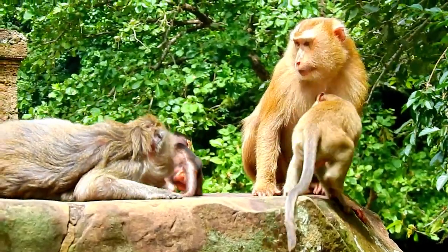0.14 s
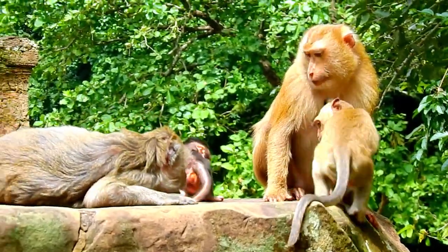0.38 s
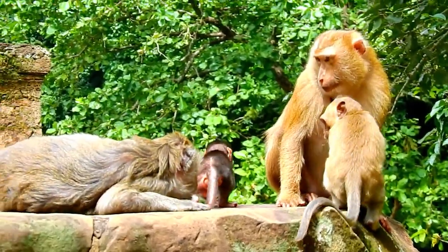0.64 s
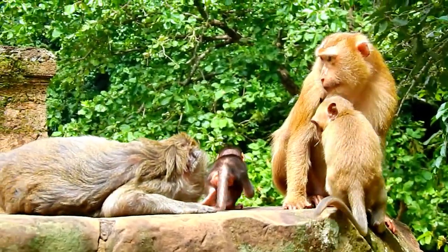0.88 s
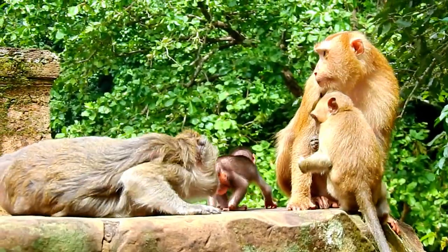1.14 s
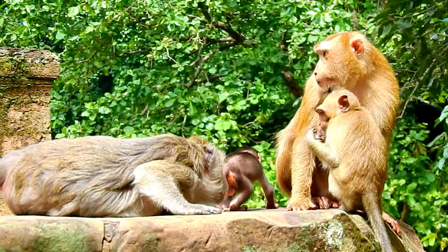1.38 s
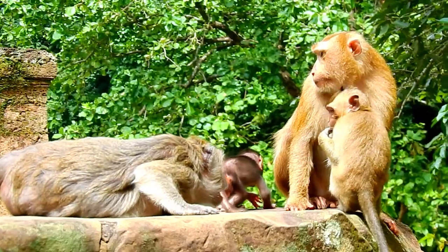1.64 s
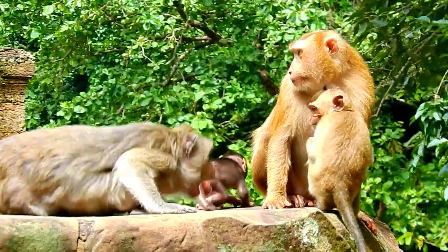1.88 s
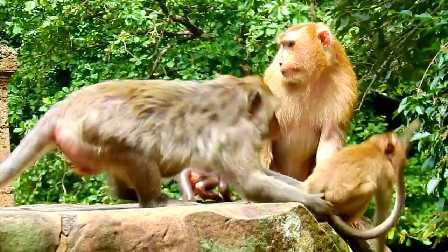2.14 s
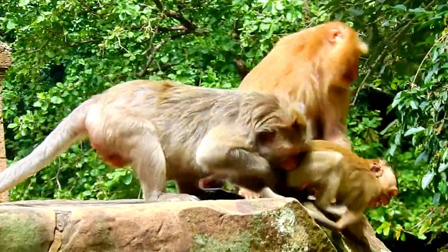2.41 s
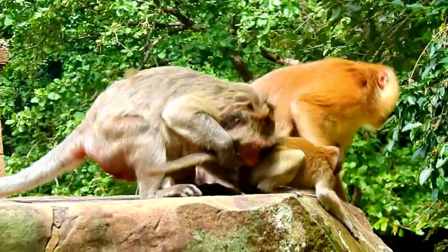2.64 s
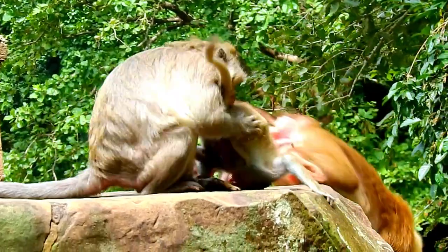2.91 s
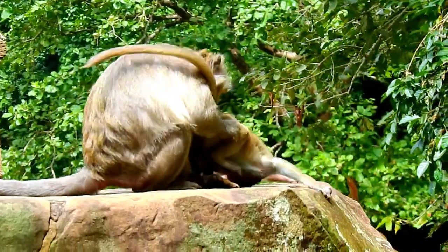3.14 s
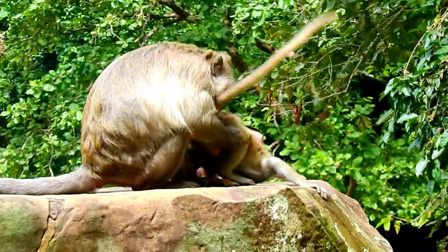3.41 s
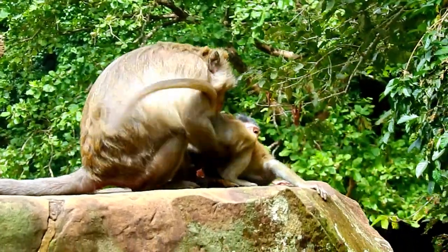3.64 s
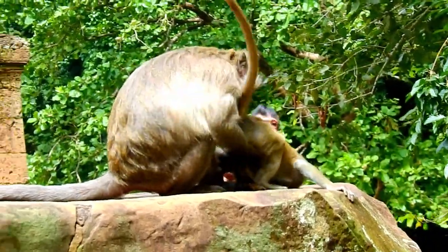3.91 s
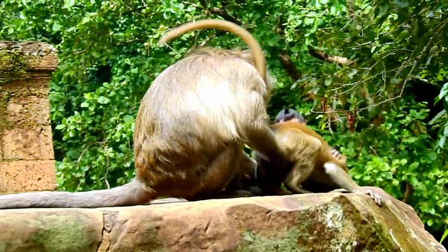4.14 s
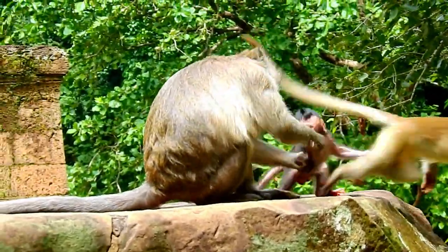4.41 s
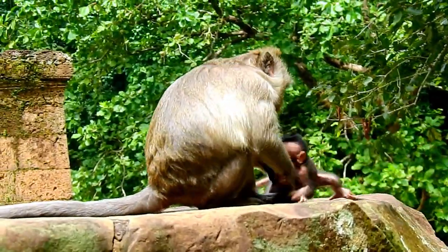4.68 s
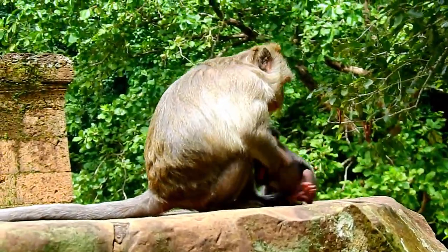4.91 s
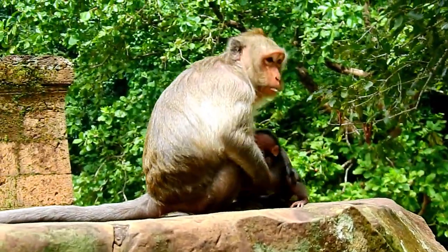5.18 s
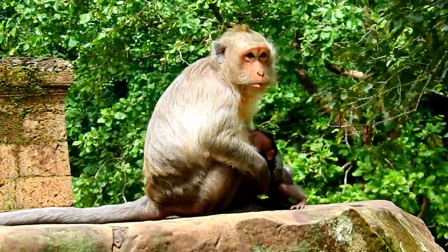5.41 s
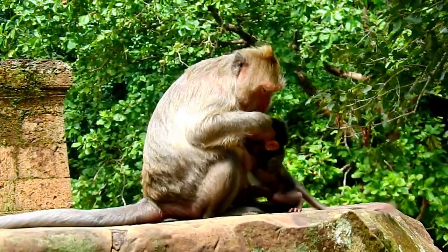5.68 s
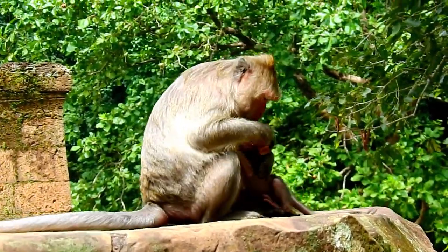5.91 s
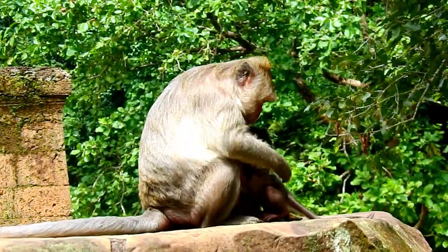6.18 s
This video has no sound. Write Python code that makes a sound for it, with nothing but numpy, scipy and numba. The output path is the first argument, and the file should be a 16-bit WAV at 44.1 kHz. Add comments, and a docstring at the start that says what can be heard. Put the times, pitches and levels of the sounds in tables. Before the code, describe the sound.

A quiet wooded outdoor spot, heard in stereo from a few metres: soft hiss, thin insect buzz, low distant traffic. Light paw taps and scuffs at 0.3 s, with a barely audible far bird whistle at 0.4-0.8 s. At 1.1 s a very loud, dry crack on stone, slightly left, then smaller taps; more slaps at 2.05 s. A short yelp at 2.3 s leads into a young monkey's piercing shriek at 2.4 s, tearing into rasp, weakening around 2.7-3.0 s, then surging harshly at 3.2-3.6 s with two paw slaps. After a tiny gap, another broken scream runs 3.8-4.2 s. Brief yelps at 4.5-4.65 s and a sharp raspy one at 4.8 s. Faint infant squeaks dot 5.1-5.6 s. At 5.95 s a cluster of hard knocks with gritty scuffing, a rough short yelp at 6.1 s, a weak one at 6.2 s. Short scattered echoes throughout.

```python
"""A young monkey shrieks on a stone ledge among trees, an adult grabbing it, a few metres from a camera's microphones.
Its vocal folds whistle at several kHz, made as jittery harmonics, and break into a rasp of noise rung by the throat.
Paws slap and scuff the stone: short noise bursts with ringing modes, and grains of grit. An infant squeaks.
Insects buzz in a narrow noise band, a far bird whistles as a gliding sine and distant traffic hums as low noise.
Coloured noise hisses behind it all; trunks and walls return a short, scattered echo."""
import sys
import numpy as np
from scipy import signal
from scipy.fft import rfft, irfft, next_fast_len
from scipy.io import wavfile
from scipy.ndimage import uniform_filter1d
from numba import njit

SR = 44100
rng = np.random.default_rng(int(sys.argv[2]) if len(sys.argv) > 2 else 0)


def how_loud(loudness_db):
    """Turn decibels into a plain amplitude multiplier (0 dB gives 1, 20 dB gives 10)."""
    steps = np.asarray(loudness_db, float) / 20
    return 10 ** steps


def output_pcm(signal):
    """Save a mono or channel-first signal as 16-bit PCM at the path in sys.argv[1].

    Samples are clipped to [-1, 1] before scaling.
    """
    pcm = np.clip(np.atleast_2d(signal).T, -1, 1) * 32767
    wavfile.write(sys.argv[1], SR, np.round(pcm).astype(np.int16))


N = 277694
TIME = np.arange(N) / SR

# Spectrum of the background hiss. Each row: frequency in Hz, density in dB per Hz (relative).
HISS_COLOUR = [(180, -47.5), (300, -20), (590, -3), (877, -3.5), (1280, 4), (2140, -3.5), (3690, -13),
               (4570, -15), (5660, -20), (6900, -19), (9450, -31.5), (15500, -35)]
# Background hiss over time. Each row: time in seconds, level in dB, added level of its top bands in dB.
HISS_LEVEL = [(0.0, -72.5, 6), (1.4, -70.5, 2), (1.7, -73.5, 1), (2.8, -72.5, 16), (3.4, -73.5, 3),
              (4.3, -75, -15.5), (5.0, -71.5, -11), (5.6, -70.5, -11), (6.3, -71, -5.5)]
# Where the hiss is split into bands that swell apart, in Hz.
HISS_EDGES_HZ = (800, 1700, 3400, 7800)
# Swell of the insect band. Each row: time in seconds, level in dB.
INSECT_LEVEL = [(0.0, -68.5), (.6, -72.5), (1.33, -75), (2.2, -73.5), (4.3, -98.5), (4.804, -68),
                (5.028, -81), (6.297, -77.5)]
# Swell of the distant traffic. Each row: time in seconds, level in dB.
HUM_LEVEL = [(0.0, -68.5), (.75, -75), (1.3, -68.5), (1.61, -74.5), (3.0, -82), (3.3, -76.5), (3.7, -79),
             (4.65, -73), (5.35, -78.5), (6.3, -73.5)]
# Spectrum of the distant traffic. Each row: frequency in Hz, density in dB per Hz (relative).
HUM_COLOUR = [(15, -68), (25, -33), (71, -2.5), (123, -3.5), (161, 1.5), (345, -11.5), (450, -13.5),
              (580, -29), (990, -120)]
# Fur and paws dragging. Each row: start in seconds, length in seconds, level in dB, lows against it in dB.
SCUFFS = [(0.278, 0.36, -67.5, -25), (0.738, 0.37, -76, -8), (1.032, 0.11, -66.5, -1),
          (1.13, 0.013, -63, -8), (1.207, 0.12, -60, -10), (1.698, 0.95, -72.5, -25),
          (2.028, 0.14, -57, -12), (3.267, 0.53, -73, 7.5), (4.042, 0.13, -76, 13), (5.06, 0.5, -79.5, 2.5),
          (5.543, 0.47, -78, 1), (5.709, 0.23, -64.5, -0.5), (5.913, 0.059, -60.5, -18),
          (5.947, 0.064, -45.5, -3), (5.991, 0.19, -57, -5), (6.165, 0.28, -63.5, -22)]
# Spectrum of the grit. Each row: frequency in Hz, density in dB per Hz (relative).
GRIT_COLOUR = [(2060, -44), (3500, -16), (4260, -5.5), (6070, -5), (6660, -0.5), (8120, -17.5),
               (11000, -30.5), (14000, -67.5)]
# Paws on stone. Each row: start in seconds, level in dB, crack pitch in Hz, relative thud in dB,
# left minus right in dB.
SLAPS = [(0.289, -55.5, 7040, -9, -18), (0.34, -53, 6100, -6.5, -10), (1.043, -56, 7140, -39, -27),
         (1.068, -49, 7300, -44.5, -21), (1.135, -18.5, 5440, -45, -9), (1.255, -48.5, 6700, -5.5, 8),
         (1.381, -51, 1940, -6, -5), (1.814, -54.5, 7000, -15, -23), (2.04, -47.5, 6300, -7, 6),
         (2.071, -34.5, 6660, -17, -3), (2.122, -36.5, 6600, -15, 4), (3.525, -36.5, 4400, -28.5, -2),
         (3.625, -39.5, 3452, -21.5, 3), (5.558, -61.5, 4390, 10.5, -9), (5.623, -62.5, 4484, 13, -12),
         (5.726, -49.5, 6840, -1.5, -19.5), (5.908, -49.5, 6350, -21, -15.5), (5.959, -25, 6500, -49, -5),
         (5.98, -29, 6600, -13.5, -5), (5.999, -37.5, 6110, -19, -10), (6.048, -44, 6510, -9, -11)]
# Modes of the ledge. Each row: frequency in Hz, level in dB, own 60 dB decay in seconds (before the blow's).
LEDGE_MODES = [(2798, 2, 0.028), (4710, 10.5, 0.00543), (5475, 6, 0.017), (6600, -3, 0.037),
               (7770, -10.5, 0.025), (12200, -24, 0.014)]
# Far bird. Each row: start in seconds, length in seconds, from Hz, to Hz, level in dB, breath share (not used).
BIRD_NOTES = [(.41, .06, 5000, 5900, -77, 0), (.48, .1, 6280, 6220, -79, 0), (.68, .09, 5000, 6700, -76, 0)]
# Added tones in and between the cries: harmonics, chirps, faint squeaks and separate whistles.
# Each row: start in seconds, length in seconds, from Hz, to Hz, level in dB, breathy share 0-1.
ADDED_TONES = [(2.25, 0.1, 5170, 6060, -61, 0), (2.535, 0.048, 11800, 12170, -58.5, 0.07),
               (2.82, 0.072, 9500, 13100, -64, 0.8), (2.88, 0.041, 12650, 15550, -56.5, 0.2),
               (2.92, 0.031, 7800, 8200, -67, 0.3), (3.01, 0.084, 15600, 14400, -50.5, 0.5),
               (3.088, .028, 13370, 13340, -49, 0.9), (3.115, 0.12, 14400, 14830, -51, 0),
               (3.26, 0.091, 12200, 12200, -62, 0.2), (3.41, .06, 9320, 9000, -49, 0),
               (3.46, 0.059, 5700, 5400, -47.5, 0.34), (3.771, .027, 1996, 3970, -48, 0.38),
               (3.772, 0.034, 1946, 2700, -55, 0.64), (2.576, 0.013, 7900, 7900, -45, 0.14),
               (2.62, .016, 7160, 7050, -44.5, 0.4), (2.975, 0.15, 10500, 10400, -59, 1),
               (3.02, 0.035, 7340, 7450, -60, .6), (3.885, 0.048, 3440, 4650, -63, 0.6),
               (3.92, 0.038, 5200, 6600, -64, .6), (3.968, .022, 11330, 11000, -67, .4),
               (4.456, 0.0099, 7040, 7000, -56, 0.3), (4.505, 0.013, 6780, 5880, -62, 0.58),
               (4.547, 0.074, 3820, 4280, -63, .9), (4.625, 0.081, 3970, 4270, -60, 0.93),
               (4.71, 0.043, 4350, 4560, -74, 1), (5.065, 0.078, 4540, 4340, -81, 0.95),
               (5.21, 0.1, 4250, 4280, -73.5, 0.84), (5.505, 0.13, 4174, 4300, -75, 0.97),
               (5.163, 0.025, 4300, 4230, -64.5, 1), (3.96, 0.033, 4740, 4500, -55.5, .3),
               (3.96, 0.08, 6680, 6770, -52, 0.3), (3.99, 0.13, 3700, 2720, -57, 0.8),
               (4.03, .11, 9040, 8800, -53, .8), (4.07, .06, 5494, 5380, -51.5, 0.3),
               (3.27, .09, 8080, 8240, -47.5, .1), (3.415, .07, 3760, 4060, -52.5, 0.1),
               (5.336, 0.028, 12880, 12800, -67.5, 1), (5.64, 0.058, 4310, 5620, -75.5, 0.8),
               (5.664, 0.019, 10770, 10980, -74.5, 0.42), (6.222, 0.027, 10700, 11370, -68, 0.68),
               (6.255, .04, 10660, 10020, -74, .7), (6.21, .085, 14250, 14400, -80, 0.95)]
# Pitch of the folds in the screams, one list per register they jump to. Each row: time in seconds, pitch in Hz.
FOLD_PITCH = [
    [(2.415, 2183), (2.44, 2696), (2.465, 3108)],
    [(2.47, 2854), (2.52, 2850), (2.54, 2720)],
    [(2.59, 3626), (2.68, 4066), (2.78, 4430), (2.92, 4150)],
    [(2.925, 3042), (2.955, 3305), (2.98, 3160), (3.1, 3366)],
    [(3.25, 2750), (3.28, 2739), (3.35, 2769)],
    [(3.36, 3713), (3.375, 3610), (3.425, 3735), (3.44, 4093), (3.47, 3907), (3.55, 3967), (3.57, 3618),
     (3.615, 3767)],
    [(3.812, 3493), (3.832, 3646), (3.838, 3050), (3.849, 2980), (3.854, 3540), (3.884, 3600), (3.95, 4600),
     (4.03, 4430)],
    [(4.035, 3370), (4.16, 3310)],
]
# The two long screams. Each row: time in seconds, effort in dB, voiced share 0-1, mouth centre in Hz,
# pharynx centre in Hz, gape 0-1.
SCREAMS = [
    [(2.395, -61, 0.01, 6600, 4900, 0.9), (2.403, -43, 0.12, 7300, 5060, 0.73),
     (2.412, -37.5, 0.9, 7840, 4600, 0.85), (2.421, -31.5, 0.65, 8560, 2600, 0.72),
     (2.446, -29, 0.26, 7520, 2720, 0.69), (2.475, -32, 0.4, 8430, 3100, 0.48),
     (2.482, -30.5, 0.14, 6740, 3370, 0.63), (2.524, -36.5, 0.7, 8070, 3130, 0.5),
     (2.54, -38, 0.67, 7650, 3330, 0.54), (2.572, -48.5, 0.13, 7600, 3570, 0.6),
     (2.58, -46, 0.2, 7800, 3560, 0.3), (2.59, -45, 0.05, 7600, 3630, 0.6),
     (2.618, -52.5, 0.06, 7600, 3740, 0.86), (2.629, -45.5, 0.2, 7140, 3430, 0.45),
     (2.641, -48.5, 0.12, 7120, 3850, 0.71), (2.757, -52, 0.45, 7700, 4180, 0.67),
     (2.803, -45.5, 0.34, 8130, 4300, .6), (2.82, -53, 0.56, 7900, 4200, 1),
     (2.9, -59.5, 0.34, 7700, 4300, 1), (2.93, -56.5, 0.46, 7900, 4200, 1),
     (2.955, -51, 0, 8400, 4100, 0.95), (2.962, -70, 0.4, 7500, 4000, 0.65),
     (2.985, -57.5, 0.76, 7060, 3900, 0.4), (3.05, -45, 0.82, 7000, 4270, .4),
     (3.07, -47, 0.67, 6920, 5440, 0.87), (3.09, -43.5, 0.36, 6500, 5360, 0.53),
     (3.21, -44.5, 0.06, 6020, 5280, 0.71), (3.235, -37.5, 0.06, 7800, 4200, 0.57),
     (3.28, -35.5, 0.09, 6230, 4070, 0.67), (3.33, -39, 0.48, 6660, 4100, .7),
     (3.365, -36, 0.39, 7520, 4150, 0.6), (3.409, -46, 0.07, 7220, 4050, 0.89),
     (3.419, -37.5, 0.47, 7600, 3950, 0.63), (3.441, -41, 0.36, 7600, 4300, 0.39),
     (3.475, -36, 0.56, 7770, 3746, 0.5), (3.555, -38, 0.3, 7520, 3370, 0.5),
     (3.569, -37.5, 0.12, 7120, 3740, 0.62), (3.611, -31, 0, 6710, 3520, 0.69),
     (3.621, -40, 0.3, 6300, 3100, 0), (3.635, -44, 0.14, 6360, 3060, 0.17)],
    [(3.775, -59, 0.16, 6850, 2700, 0.3), (3.788, -50.5, 0.45, 7000, 2770, 0.63),
     (3.8, -63, 0.42, 6000, 2900, 0.53), (3.818, -48, 0.54, 6800, 2890, 0.72),
     (3.83, -45, 0.54, 6760, 2900, 0.5), (3.845, -51, 0.4, 6010, 2884, 0.33),
     (3.862, -41, 0.89, 6840, 2950, 0.2), (3.882, -39.5, 0.85, 7100, 3060, 0.28),
     (3.9, -58, 0.46, 7500, 3663, .2), (3.95, -51, 0.57, 8600, 3970, 0.33),
     (3.985, -44, 0.87, 8450, 3700, 0.9), (4.028, -41, .38, 6900, 3350, 0.78),
     (4.056, -34, 0.32, 6600, 3050, 0.77), (4.075, -39.5, 0.15, 6210, 3820, 0.9),
     (4.142, -37.5, 0.45, 6450, 4610, 0.5), (4.2, -69, 0.17, 6580, 4110, 0.8)],
]
# Short cries. Each row: start in seconds, held for seconds, effort in dB, pitch in Hz, voiced share 0-1.
YELPS = [(2.261, .036, -44.5, 3750, 0.35), (4.466, .038, -41.5, 3448, 0.94), (4.545, .045, -55, 3494, 0.7),
         (4.62, .05, -58, 3890, 0.17), (4.787, .018, -36.5, 3620, 0), (5.335, .03, -57.5, 3545, 0.43),
         (6.124, 0.023, -34, 2150, 0.51), (6.202, .04, -54, 3430, 0.3)]
# What the mouth does to each harmonic. Each row: frequency in Hz, gain in dB.
VOICE_COLOUR = [(1800, -19), (2300, -13), (2900, 5), (3500, -16.5), (4200, 9), (5500, -2), (7200, 1),
                (9000, -5.5), (11000, -20), (14000, -18.5)]
# The treble mode moves with the jaw. Each row: time in seconds, centre in Hz.
TREBLE_PATH = [(2.4, 9950), (2.8, 10400), (2.9, 12420), (2.93, 9200), (3.06, 9890), (3.2, 10900),
               (3.26, 11760), (3.45, 11400), (3.55, 10700), (3.8, 12620), (3.92, 12300), (3.98, 11100),
               (4.05, 10610), (4.5, 9650), (4.8, 9600), (5.35, 12930), (6.3, 11100)]
# Throat modes. Each row: centre in Hz, width of one filter pass in Hz, level in dB with the mouth wide open.
THROAT = [(5500, 1000, -6), (7000, 2400, -6), (8400, 1200, -8)]
# The infant's squeaks. Each row: start in seconds, held for seconds, level in dB, middle pitch in Hz.
PEEPS = [(5.083, 0.025, -71, 2896), (5.192, .014, -55.5, 4250), (5.298, 0.013, -59, 3760),
         (5.333, .03, -61, 3704), (5.484, 0.01, -46.5, 4200), (5.527, 0.041, -73, 4270),
         (5.563, .012, -64.5, 4300), (5.597, 0.012, -57.5, 3850)]
# Where the cries come from. Each row: time in seconds, left minus right in dB.
CRY_SIDE = [(2.26, -1.5), (4.28, -1.5), (4.5, -1.5), (5.3, -5), (6.3, -7)]

CALL_RISE_S, CALL_RISE_DB, CALL_SAG_DB, CALL_FALL_DB = 0.003, 14.5, 2.5, 19.5
CALL_STOP_S, CALL_STOP_DB, CALL_TAIL_S = 0.004, 11, 0.024  # cut off, then trailing away
LEFT_RIGHT = np.array([[1], [-1]])


def curve(points):
    """A level or frequency joined by straight lines in time."""
    return np.interp(TIME, *np.transpose(points))


def colour(x, points):
    """Filter by (Hz, dB) points joined on a log axis; rms 1."""
    hz, db = np.transpose(points)
    size = next_fast_len(N)
    f = np.arange(size // 2 + 1) * SR / size + 1
    gain = how_loud(np.interp(np.log(f), np.log(hz), db, -120, -120))
    y = irfft(rfft(x, size) * gain, size)[..., :N]
    return y / np.std(y)


@njit
def svf(x, hz, width):
    """State-variable band-pass with a moving centre."""
    y, band, low = np.empty(len(x)), 0., 0.
    for i in range(len(x)):
        g, k = np.tan(np.pi * hz[i] / SR), width / hz[i]
        v = (band + g * (x[i] - low)) / (1 + g * (g + k))
        band, low, y[i] = 2 * v - band, low + 2 * g * v, k * v
    return y


def ring(x, hz, width):
    """A steep resonance: one band-pass applied three times; rms 1."""
    hz = np.clip(hz + np.zeros(len(x)), 50, .45 * SR)
    for _ in range(3):
        x = svf(x, hz, 1. * width)
    return x / np.std(x)


def walk(rate):
    """Random levels held 1 / rate s and slewed twice; spread 1."""
    hold = max(int(SR / rate), 2)
    steps = np.repeat(rng.standard_normal(N // hold + 1), hold)
    w = uniform_filter1d(uniform_filter1d(steps, hold), hold)[:N]
    return w / np.std(w)


def play(tables, fade_s):
    """Columns of all calls per sample, and a gate that opens only during the calls."""
    s, *columns = np.transpose(np.vstack(tables))
    is_on = sum((TIME >= t[0][0]) & (TIME < t[-1][0]) for t in tables) > 0
    gate = uniform_filter1d(1. * is_on, max(int(fade_s * SR), 1))
    return gate, [np.interp(TIME, s, c) for c in columns]


def glides(rows):
    """Rows of start, length, two pitches, level and breath as curves that grow by 1.5 dB from start to end."""
    return [[(s, a, db - 0.75, share), (s + length, b, db + 0.75, share)]
            for s, length, a, b, db, share in rows]


def short_call(s, length, db, *held):
    """A quick rise, a hold, a sudden stop and a faint tail in level; the other columns are held."""
    end = s + max(length, 2 * CALL_RISE_S)
    return [(s, db - CALL_RISE_DB, *held),
            (s + CALL_RISE_S, db, *held),
            (end, db - CALL_SAG_DB, *held),
            (end + CALL_STOP_S, db - CALL_STOP_DB, *held),
            (end + CALL_TAIL_S, db - CALL_FALL_DB, *held)]


def pan(x, db):
    """Place a sound by its left minus right level."""
    return np.array([x * how_loud(db / 2), x * how_loud(-db / 2)])


def tone(hz):
    """Phase of a gliding oscillator."""
    return 2 * np.pi * np.cumsum(hz) / SR


def breathy(phase, share):
    """A tone whose strength partly tumbles at random, which spreads it into a band."""
    share = np.clip(share, 0, 1)
    return (np.sqrt(1 - share) + np.sqrt(share) * walk(950)) * np.sin(phase)


def hiss(mid, side):
    """Background hiss: coloured noise whose bands swell and flicker apart."""
    noise = colour(mid + 0.27 * side * LEFT_RIGHT, HISS_COLOUR)
    s, db, top_db = np.transpose(HISS_LEVEL)
    lows = [0]
    for hz in HISS_EDGES_HZ:
        lows.append(signal.sosfiltfilt(signal.butter(3, hz, fs=SR, output="sos"), noise))
    lows.append(noise)
    out = 0
    for k, (below, upto) in enumerate(zip(lows, lows[1:])):
        swell_db = 1.8 * walk(5) + 1.3 * walk(22)
        if k > 2:  # the top two bands have a level of their own over time
            swell_db = swell_db + np.interp(TIME, s, top_db)
        out = out + (upto - below) * how_loud(swell_db)
    return out * how_loud(np.interp(TIME, s, db))


def insects(mid, side):
    """A throbbing insect band: noise rung around a slowly wandering pitch."""
    pitch_hz = 4750 * (1 + .015 * walk(4))
    buzz = np.array([ring(v, pitch_hz, 1400) for v in mid + 0.59 * side * LEFT_RIGHT])
    return buzz * how_loud(curve(INSECT_LEVEL) + 2 * walk(12) + 2 * walk(4) + 1.5 * walk(45))


def traffic(side):
    """Distant traffic: a low, nearly centred hum of coloured noise."""
    hum = colour(rng.standard_normal(N) + 0.091 * side * LEFT_RIGHT, HUM_COLOUR)
    return hum * how_loud(curve(HUM_LEVEL) + 1.5 * walk(8))


def background():
    """Hiss, insects and traffic; hiss and insects share their noise, and all three share its side part."""
    mid, side = rng.standard_normal((2, N))
    return hiss(mid, side) + insects(mid, side) + traffic(side)


def scuffs():
    """Dense grains of grit under moving paws; low and high grains come and go apart."""
    s, length, db, low_db = np.transpose(SCUFFS)[:, :, None]
    rise_s, fall_db = 0.011, 11.5  # the fall is over the length
    since = np.clip(TIME - s, 0, None)
    drag = np.minimum(since / rise_s, 1) * how_loud(db - fall_db * since / length)
    grit = rng.standard_normal(N) * how_loud(2.5 * walk(300))
    high = how_loud(0.55 * walk(28) + 2.5 * walk(7)) * colour(grit, GRIT_COLOUR)
    low = how_loud(4.8 * walk(23)) * ring(grit, 2070, 3416)
    return drag.sum(axis=0) * high + (drag * how_loud(low_db)).sum(axis=0) * low


def trees(x):
    """Scattered echoes: a quick cluster off the stone, a longer and duller tail off trunks."""
    late_t60_s, late_db, early_t60_s, early_db = 0.38, -13, 0.036, -6
    t = np.arange(SR // 2) / SR
    mid, side = rng.standard_normal((2, len(t)))
    side = side - uniform_filter1d(side, size=9)  # the lows arrive alike left and right
    echo = mid + how_loud(-1.1) * side * LEFT_RIGHT
    dull = uniform_filter1d(echo, size=2)
    late_decay = how_loud(late_db - 60 * t / late_t60_s) * np.clip(t / 0.026, 0, 1)
    late = late_decay * dull / np.sqrt(late_t60_s * SR / 14)
    early = how_loud(early_db - 60 * t / early_t60_s) * echo / np.sqrt(early_t60_s * SR / 14)
    return signal.fftconvolve(x[None], early + late, axes=1)[:, :N]


def slaps():
    """Paw blows: a wide tick, a short crack at its own pitch, the ledge's modes and a low thud."""
    size = 8192
    out, t = np.zeros((2, N + size)), np.arange(size) / SR
    peaks = np.transpose(SLAPS)[1]
    for s, db, hz, thud_db, pan_db in SLAPS:
        # decay in seconds of the softest and the hardest blow
        t60 = np.interp(db, [peaks.min(), peaks.max()], [0.043, 0.016])
        noise = rng.standard_normal((3, size))
        decay = how_loud(-60 * t / max(t60, .005)) * np.clip(t / (t60 * 0.032), 0, 1)
        stone = sum(how_loud(g - 60 * t / d) * np.sin(2 * np.pi * f * t) for f, g, d in LEDGE_MODES)
        crack = decay * (ring(noise[0], hz, 2000) + how_loud(-8.5) * stone)
        # harder blows start with a stronger bright tick
        crack = crack + decay ** 2 * how_loud(.5 * db - 4.0) * ring(noise[2], 6900, 7280)
        thud = how_loud(-60 * t / 0.13) * np.clip(t / 0.0011, 0, 1) * ring(noise[1], 1180, 770)
        thud = how_loud(thud_db + 1.5) * thud / np.abs(thud).max()
        # the ledge spreads the thud, so it sits nearer the middle
        blow = pan(crack / np.abs(crack).max(), pan_db) + pan(thud, 0.41 * pan_db)
        start = int(s * SR)
        out[:, start:start + size] += how_loud(db) * blow
    return out[:, :N]


def bird():
    """A faint, far whistle: a gliding sine, a little unsteady in pitch and level."""
    gate, (hz, db, _) = play(glides(BIRD_NOTES), 0.015)
    sine = np.sin(tone(hz * (1 + 0.0053 * walk(260))))
    return gate * np.sqrt(2) * how_loud(db + 4.5 * walk(100.0)) * sine


def added_tones():
    """Gliding, partly breathy tones in and between the cries, each unsteady in pitch and level."""
    out = 0
    for glide in glides(ADDED_TONES):
        gate, (hz, db, share) = play([glide], 0.0024)
        level = how_loud(db + 2.5 * walk(250) + 1.2 * walk(60))
        out = out + gate * level * breathy(tone(hz + 110 * walk(400) + 70 * walk(60)), share)
    return out


def squeals(effort_db, voiced, mouth_hz):
    """Folds at several kHz; the rougher, the more pitch and strength of each harmonic stumble."""
    yelp_pitch = [[(s, hz), (s + length + CALL_TAIL_S, hz)] for s, length, _, hz, _ in YELPS]
    gate, (hz,) = play(sorted(FOLD_PITCH + yelp_pitch), 0.0052)
    hoarse, clean = 0.6, 0.16  # roughness of a barely voiced and of a fully voiced cry
    rough = hoarse + (clean - hoarse) * voiced
    phase = tone(hz * (1 + 0.045 * rough * (walk(700) + .6 * walk(120))))
    colour_hz, colour_db = np.transpose(VOICE_COLOUR)
    treble_hz = curve(TREBLE_PATH)
    focus_db = 30  # lost per octave away from the mouth's resonance
    out = power = 0
    for k, breath_share in ((1, 0), (2, .03), (3, .8), (4, .95)):
        near_mouth_db = -focus_db * np.abs(np.log2(k * hz / mouth_hz))
        near_treble_db = 3 - 2 * focus_db * np.abs(np.log2(k * hz / treble_hz))
        voice_db = np.interp(np.log(k * hz), np.log(colour_hz), colour_db, right=-120)
        gain = how_loud(voice_db + np.maximum(near_mouth_db, near_treble_db))
        shimmer = how_loud(6 * rough * (walk(350) + walk(70)))
        out = out + gain * shimmer * breathy(k * phase, breath_share)
        power = power + gain ** 2
    out = out * how_loud(effort_db - 3.0) * np.sqrt(voiced / power)
    return np.sqrt(2) * (gate * out + added_tones())


def breath():
    """Gate, effort, voiced share, mouth, pharynx and gape through all screams and yelps."""
    mouth_hz, pharynx_hz, gape = 6636, 5000, 0.078  # held through every yelp
    yelps = [short_call(s, length, db, share, mouth_hz, pharynx_hz, gape)
             for s, length, db, _, share in YELPS]
    gate, (db, share, *tract) = play(sorted(SCREAMS + yelps), 0.0033)
    return gate, db, np.clip(share, 0, 1), tract


def rasps(effort_db, voiced, mouth_hz, pharynx_hz, gape):
    """Chaotic folds: air comes in uneven bursts and rings mouth, pharynx and throat."""
    pharynx_db = -8.5 - 0.38 * (effort_db + 44.5)  # weaker against the mouth as effort grows
    shut_db, open_db = -41.5, 0.83
    treble_db = shut_db + (open_db - shut_db) * gape + 12 * voiced  # clean folds still hiss high up
    air = rng.standard_normal(N) * how_loud(-1.0 * walk(600))
    # each mode: centre in Hz, width of one filter pass in Hz, level in dB
    modes = [(mouth_hz, 2100, -1.0),
             # a narrow strand wanders inside the mouth's band and tears in and out
             (mouth_hz * (1 + .025 * walk(220)), 450, -9 + 5 * walk(110)),
             (pharynx_hz, 950, pharynx_db + 1.9 * walk(50)),
             (curve(TREBLE_PATH), 3000, treble_db),
             (13000, 6000, treble_db - 8.5),
             (14000, 5000, -24)]
    for hz, width, db in THROAT:
        # a shut mouth dulls the throat, per octave above its lowest mode
        dulling_db = 19 * (1 - gape) * np.log2(hz / THROAT[0][0])
        modes.append((hz, width, db - dulling_db))
    out = 0
    for hz, width, db in modes:  # every mode flickers and drifts on its own
        flicker = how_loud(db + 2.6 * walk(220))
        out = out + flicker * ring(air, hz * (1 + .035 * walk(40)), width)
    return how_loud(effort_db - 2.5) * (1 - voiced) ** 1.07 * out


def peeps():
    """The infant's small throat: an unsteady, sagging tone with air hissing around its pitch."""
    sag = 0.059  # share of the pitch, above it at the start and below it near the end
    calls = []
    for s, length, peak_db, hz in PEEPS:
        calls.append([(t, db, hz * (1 + sag * (1 - 2 * (t - s) / (length + CALL_TAIL_S))))
                      for t, db in short_call(s, length, peak_db)])
    gate, (db, hz) = play(calls, 0.0017)
    phase = tone(hz * (1 + .02 * walk(700) + .012 * walk(120)))
    overtones = how_loud(-35) * breathy(2 * phase, .9) + how_loud(-27.5) * breathy(3 * phase, .9)
    voice = how_loud(3 * walk(300)) * (np.sin(phase) + overtones)
    mouth = how_loud(-13.5 + 2.4 * walk(200)) * ring(rng.standard_normal(N), 6900, 2100)
    breath_noise = how_loud(-0.5) * ring(rng.standard_normal(N), hz, 985)
    return gate * how_loud(db) * (voice + mouth + breath_noise)


def scene():
    """Cries, scuffle and bird, their echoes and the background."""
    gate, effort_db, voiced, tract = breath()
    screams = gate * rasps(effort_db, voiced, *tract) + squeals(effort_db, voiced, tract[0])
    cries = pan(screams + peeps(), curve(CRY_SIDE))
    direct = cries + slaps() + pan(scuffs(), -2.0) + pan(bird(), 3.1)
    return direct + trees(direct.mean(axis=0)) + background()


def top_cut(x):
    """Nothing passes above the cut-off."""
    return signal.sosfilt(signal.butter(12, 15830, fs=SR, output="sos"), x)


def record(dry):
    """The camera cuts the top steeply above 15.8 kHz."""
    low_pass = signal.ellip(10, .3, 80, 15800, fs=SR, output="sos")
    mix = signal.sosfilt(low_pass, dry)
    return top_cut(mix)


dry = scene()
out = record(dry)
output_pcm(out)
```